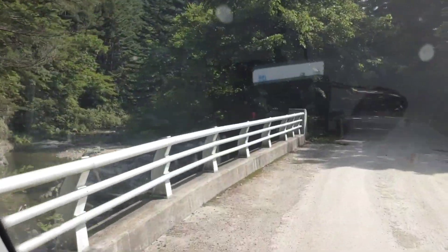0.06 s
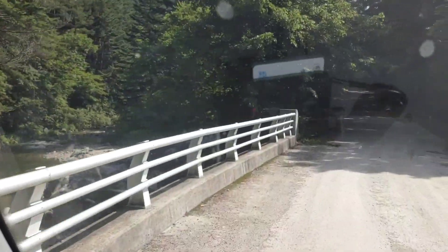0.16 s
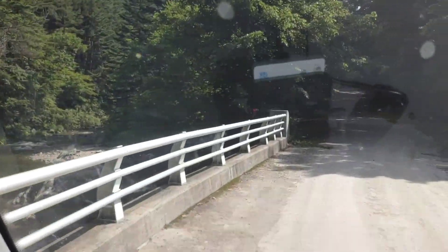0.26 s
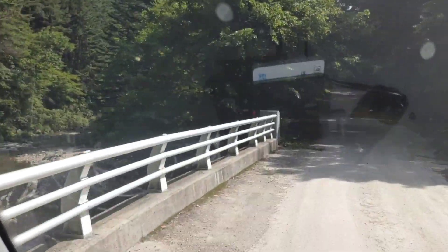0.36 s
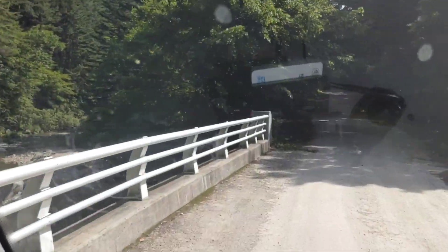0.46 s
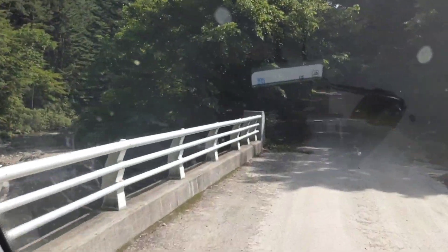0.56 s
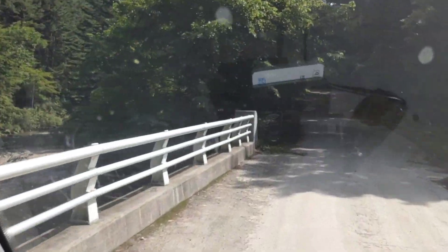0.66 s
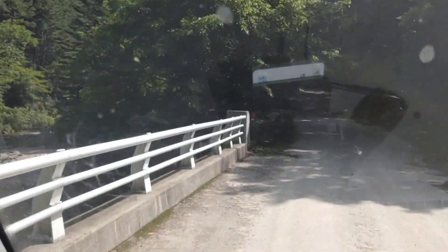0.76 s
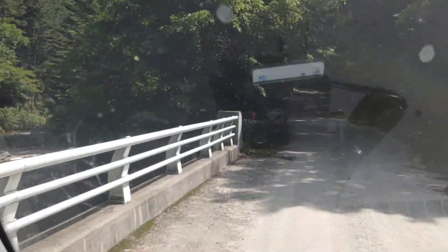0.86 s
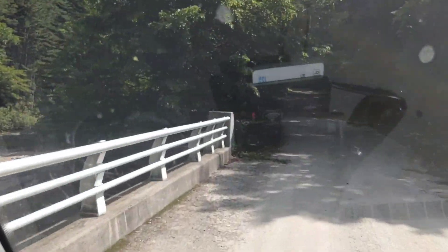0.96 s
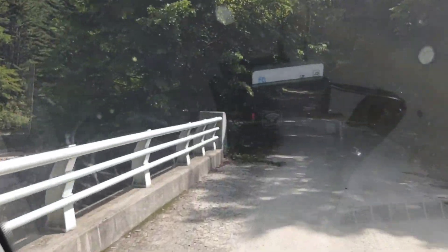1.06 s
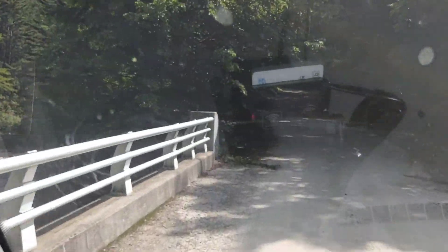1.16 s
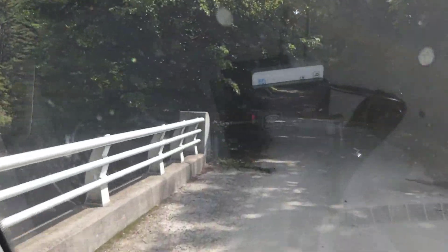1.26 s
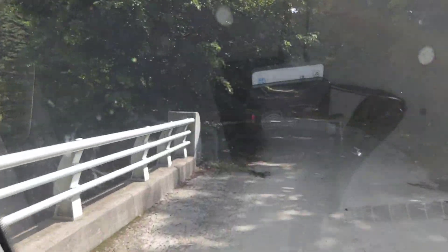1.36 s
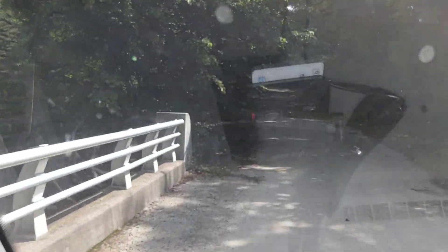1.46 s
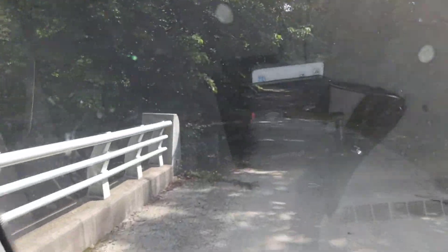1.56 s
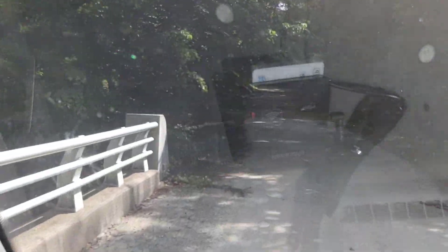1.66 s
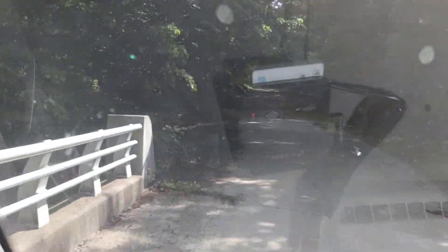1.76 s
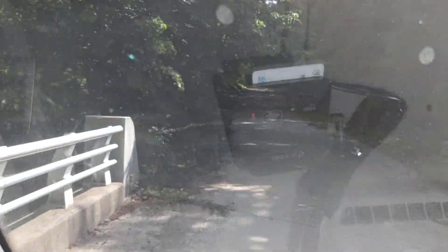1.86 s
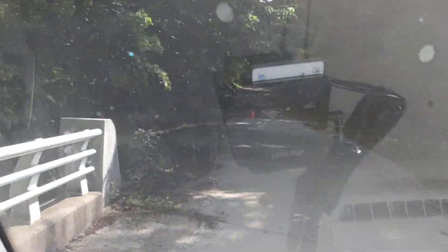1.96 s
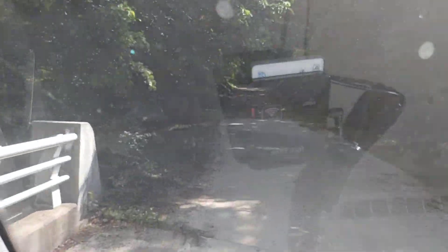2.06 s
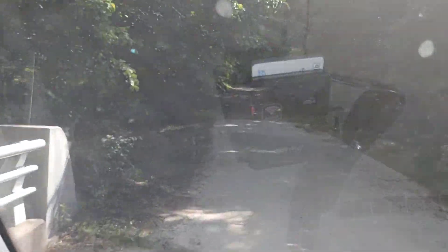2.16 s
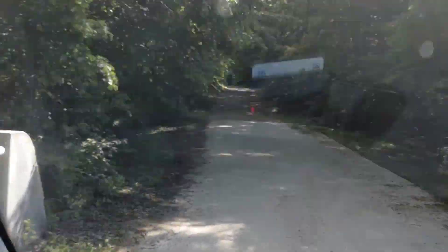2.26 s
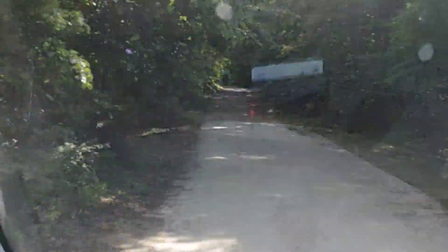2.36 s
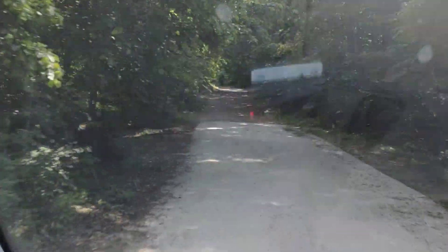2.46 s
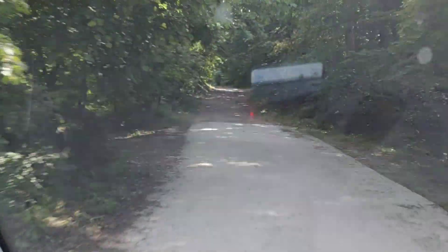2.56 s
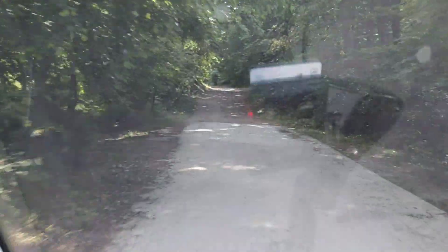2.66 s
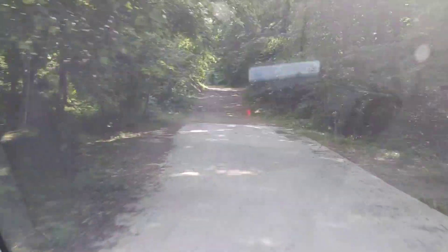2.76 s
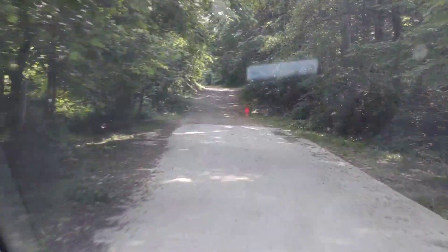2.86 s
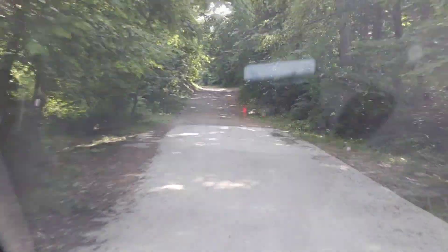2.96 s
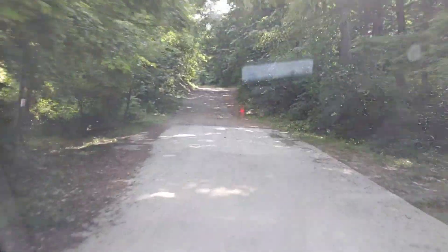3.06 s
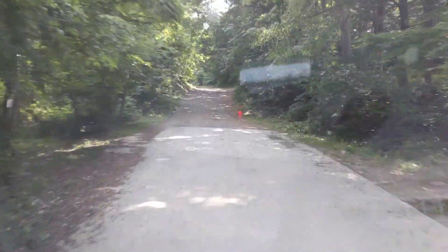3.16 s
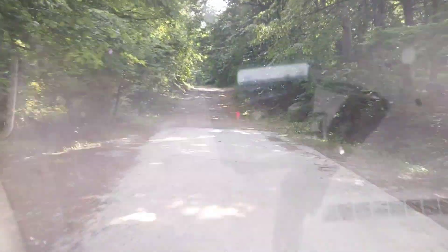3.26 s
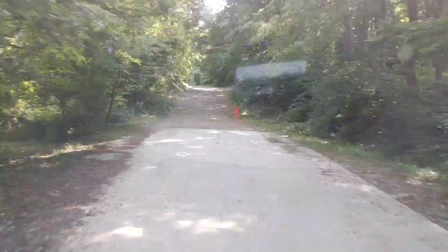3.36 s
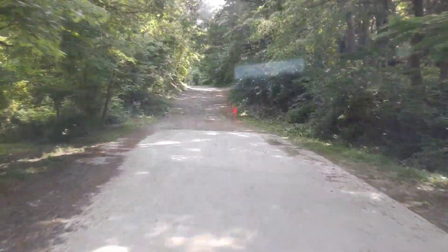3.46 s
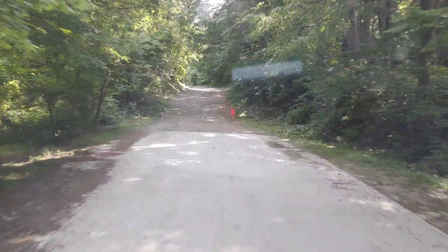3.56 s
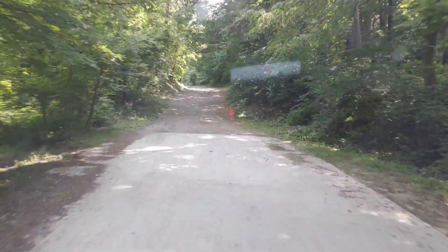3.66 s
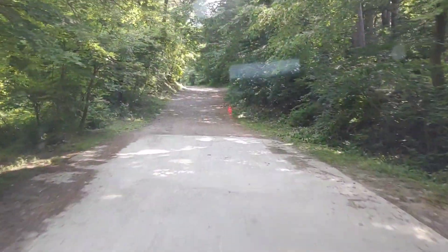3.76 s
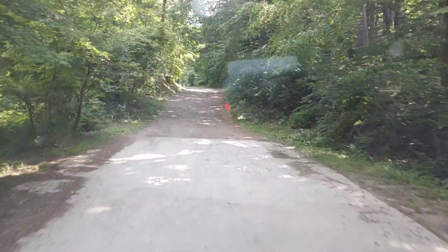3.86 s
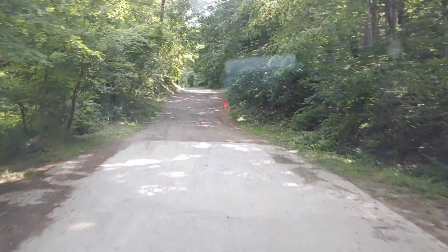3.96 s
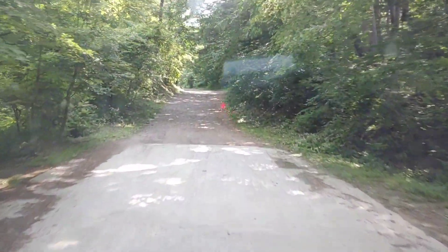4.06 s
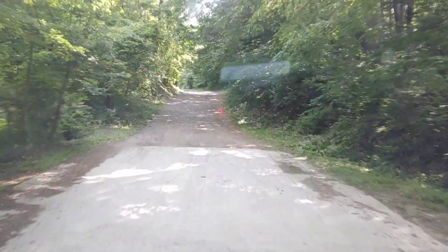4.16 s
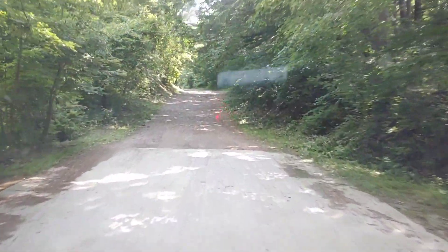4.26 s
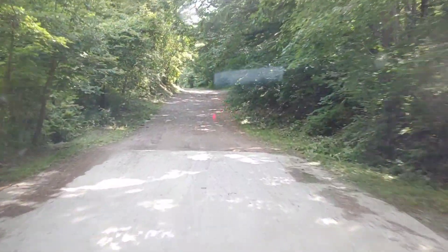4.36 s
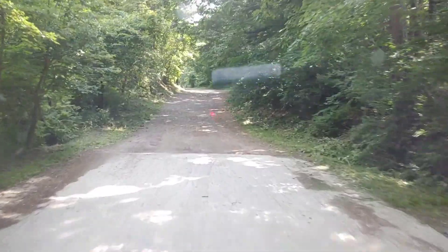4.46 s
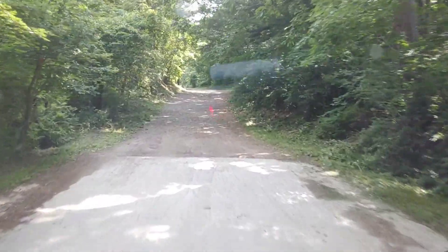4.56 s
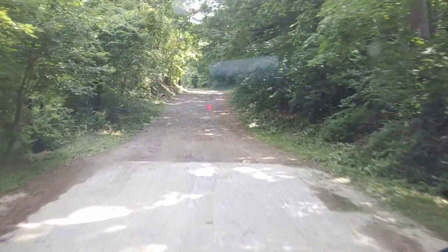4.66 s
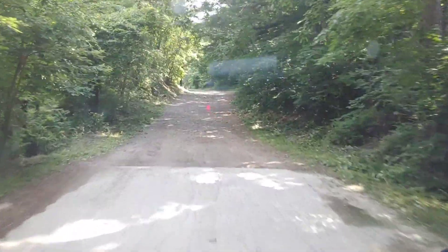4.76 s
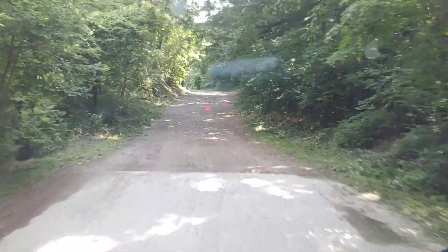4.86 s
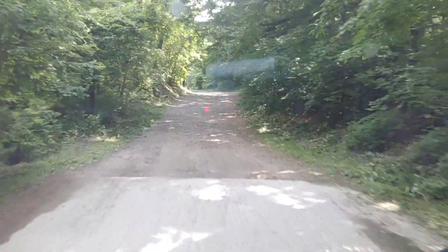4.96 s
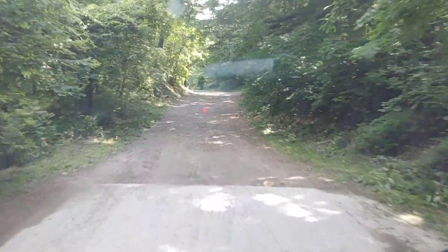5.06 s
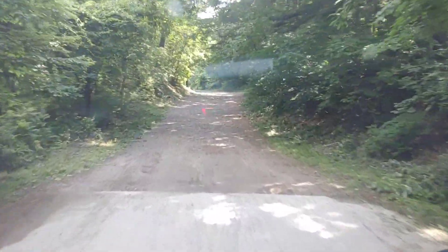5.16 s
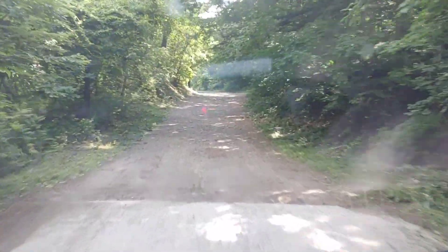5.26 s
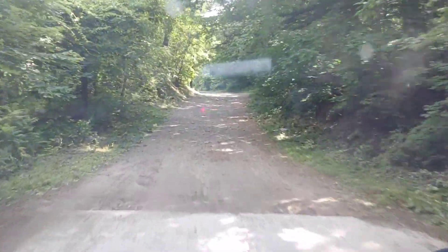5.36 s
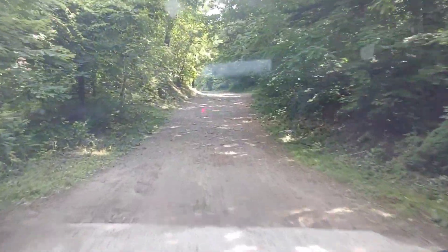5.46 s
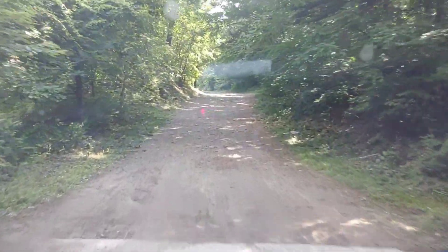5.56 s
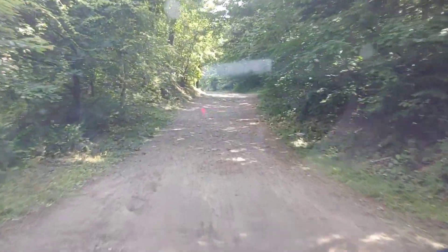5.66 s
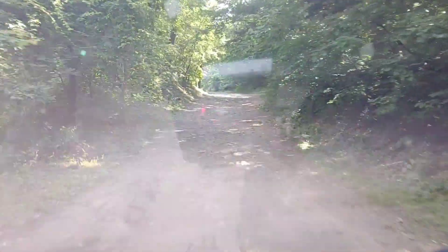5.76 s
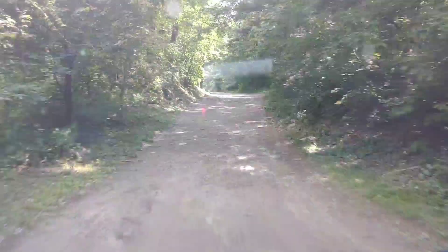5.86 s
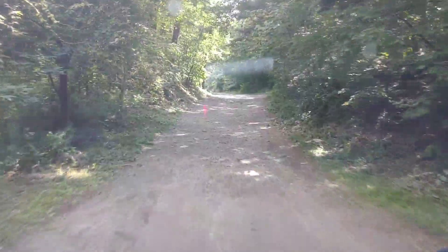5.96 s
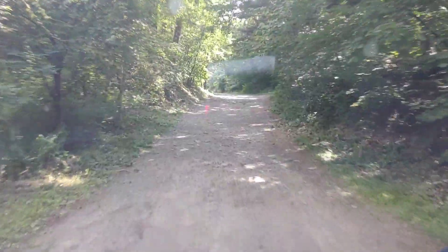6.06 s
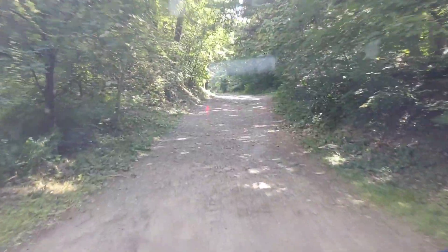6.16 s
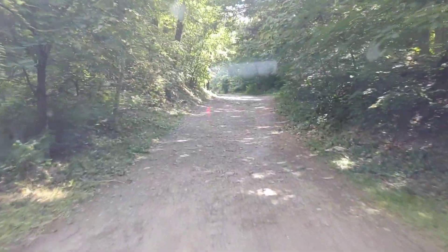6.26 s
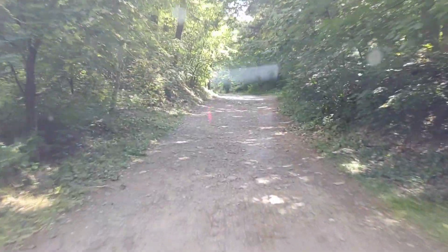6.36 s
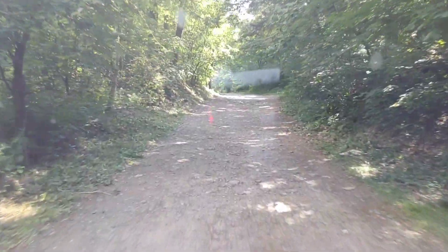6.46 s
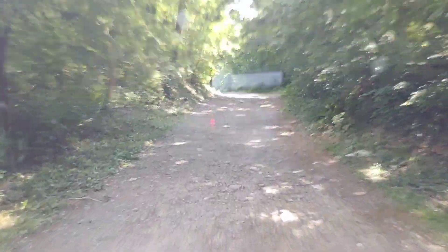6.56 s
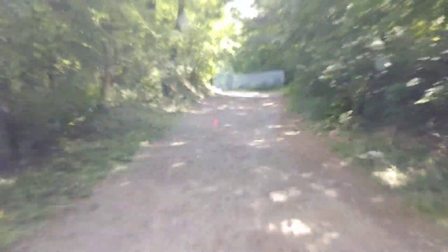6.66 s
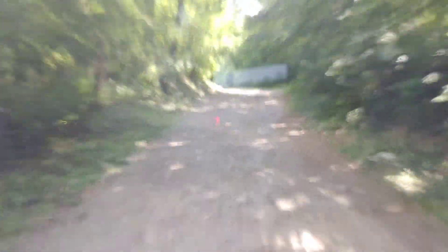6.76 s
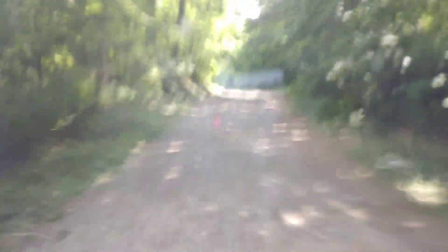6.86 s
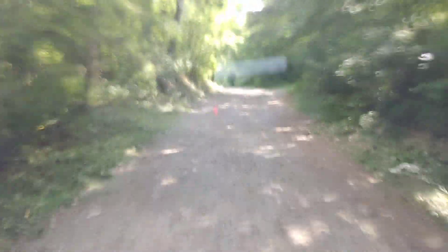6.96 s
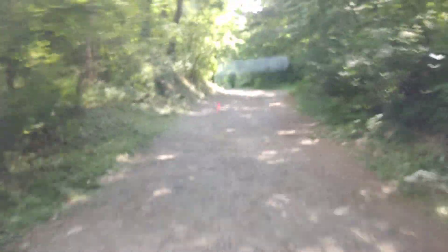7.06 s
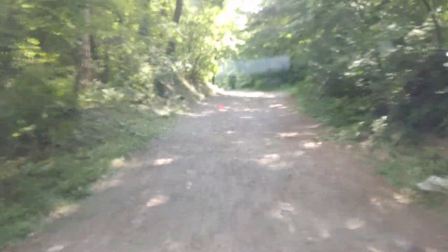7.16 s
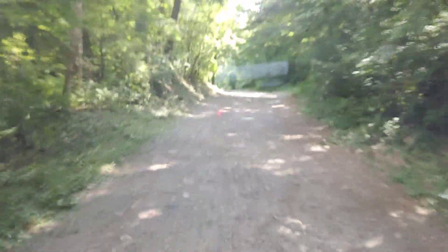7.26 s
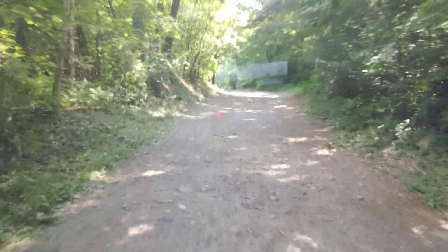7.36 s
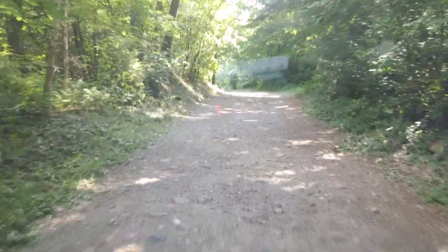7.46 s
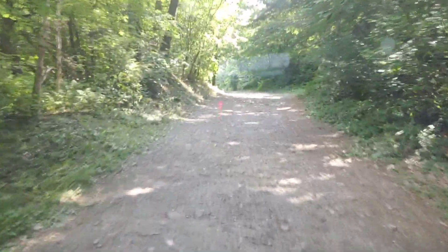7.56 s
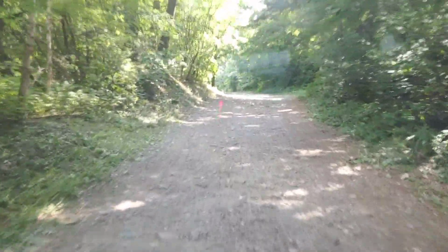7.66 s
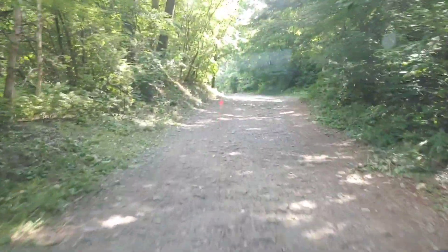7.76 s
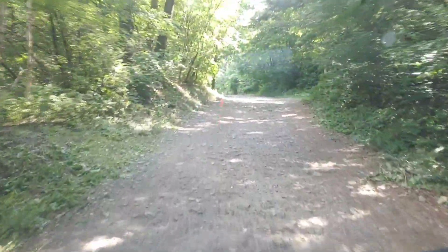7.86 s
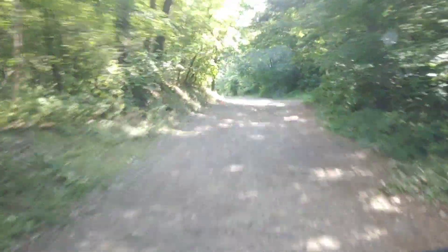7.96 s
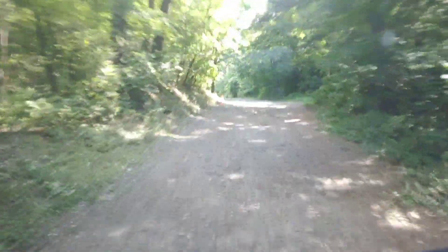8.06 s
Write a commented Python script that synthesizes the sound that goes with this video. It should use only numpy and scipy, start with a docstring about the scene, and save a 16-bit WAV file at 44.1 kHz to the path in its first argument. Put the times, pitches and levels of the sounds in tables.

```python
"""Car cabin, bridge deck to gravel

Inside a car on a concrete bridge deck: a brief stretch of stones at 3 s, a drop onto gravel at 6.6 s.
Engine: summed firing harmonics and gear whines. Tyres: noise through cabin modes, hiss, a narrow tread band.
Bumps: force bursts through cabin and trim responses. Gravel: random grains, crunches, knocks, snaps, clunks.
Close echoes comb the treble; a look-ahead limiter holds the peaks."""
import sys
import numpy as np
from scipy import signal
from scipy.fft import rfft, irfft, next_fast_len
from scipy.io import wavfile
from scipy.ndimage import uniform_filter1d, minimum_filter1d

SR = 44100
rng = np.random.default_rng(int(sys.argv[2]) if len(sys.argv) > 2 else 0)


def dump_mix(stems):
    """Bounce the given channels to the path in sys.argv[1] as a 16-bit WAV at rate SR."""
    frames = np.atleast_2d(stems).T  # one column per channel
    limited = np.clip(frames, -1, 1)  # hard clip at full scale
    pcm = np.round(limited * 32767).astype(np.int16)
    wavfile.write(sys.argv[1], SR, pcm)


N = 358091


def undb(db):
    """Decibels to amplitude gain."""
    return 10 ** (np.asarray(db) / 20)


def unit(x):
    """Scale to rms 1."""
    return x / np.sqrt(np.mean(x ** 2) + 1e-18)


def curves(table):
    """Each column of a timed table, interpolated per sample."""
    time_s, *columns = np.transpose(table)
    return [np.interp(np.arange(N) / SR, time_s, column) for column in columns]


def bins(size):
    """Spectrum frequencies in Hz, floored at 1."""
    return np.maximum(np.fft.rfftfreq(size, 1 / SR), 1)


def gains(points, size):
    """Gain per bin from (freq_hz, level_db) points, on a log frequency axis."""
    hz, db = np.transpose(points)
    return undb(np.interp(np.log(bins(size)), np.log(hz), db))


def causal(gain):
    """Minimum-phase response with these gains: it rings only after a blow."""
    cepstrum = irfft(np.log(gain))
    half = len(cepstrum) // 2
    cepstrum[1:half] *= 2
    cepstrum[half + 1:] = 0
    return np.exp(rfft(cepstrum))


# cabin air and panel modes: freq_hz, width_hz, level_db
CABIN_MODES = [(29.18, 7.1, -24), (58.2, 47, -0.5), (98.1, 6.1, 5.5), (143.8, 39, 1), (175.2, 27.4, 0),
               (233.5, 45, -4.5), (296.4, 19, -11.5), (342.2, 26, -9.5), (449.7, 21.4, -10.5),
               (550, 130, -17.5)]


def cabin(size):
    """Gain per bin of the cabin's resonances, summed in power."""
    f = bins(size)
    power = 0
    for hz, width_hz, db in CABIN_MODES:
        detuning = (f * f - hz * hz) / (f * width_hz)
        power = power + undb(2 * db) / (1 + detuning ** 2) ** 1.594
    return np.sqrt(power)


# stereo width at the two microphones: freq_hz, side_minus_mid_db
STEREO_WIDTH = [(40, -18), (120, -24), (190, -18.5), (260, -14.5), (350, -5.5), (600, -1), (1200, 2.5),
                (3000, -1), (15000, 0.5)]


def response(gain):
    """Mid and side responses: long waves reach both microphones alike."""
    size = 2 * (len(gain) - 1)
    return np.array([causal(gain), causal(gain * gains(STEREO_WIDTH, size))])


def radiate(force, gain):
    """Two rows of force through a response -> mid and side, with the mid at rms 1."""
    out = signal.fftconvolve(force, irfft(response(gain)), axes=1)[:, :N]
    return out / np.sqrt(np.mean(out[0] ** 2))


def walk(rate_hz):
    """Gaussian points, rate_hz per second, joined by straight lines."""
    steps = rng.standard_normal(2048)
    return 0.707 * np.interp(np.arange(N) / SR * rate_hz, np.arange(len(steps)), steps)


def grains(per_s, spread_db, length_s):
    """Stone contacts at chance moments and strengths, each a short decaying scatter of force."""
    strength = undb(spread_db * np.minimum(rng.exponential(size=N), 4))
    hits = (rng.random(N) < per_s / SR) * strength
    power = signal.lfilter([1], [1, -np.exp(-2 / (length_s * SR))], hits ** 2)
    return unit(np.sqrt(power) * rng.standard_normal((2, N)))


def add(out, start_s, sound):
    """Mix a sound in at start_s."""
    i = max(int(start_s * SR), 0)
    out[:, i:i + sound.shape[1]] += sound[:, :max(N - i, 0)]


def envelope(start_s, hold_s, attack_s, release_s, sag_db_per_s):
    """Linear attack, a hold that sags, exponential release."""
    t = np.arange(N) / SR - start_s
    sag = np.log(10) / 20 * sag_db_per_s * np.clip(t, 0, hold_s)
    fall = sag + np.maximum(t - hold_s, 0) / release_s
    return np.clip(t / attack_s, 0, 1) * np.exp(-np.minimum(fall, 20))


# engine speed: time_s, firing_hz
FIRING_RATE = [(0, 48.9), (.5, 49.7), (1.2, 52.26), (1.95, 53.02), (2.7, 55.3), (3.4, 57.4), (3.95, 58.03),
               (4.65, 57.72), (5.05, 55.58), (5.7, 55.92), (6.5, 55.1)]
# firing harmonics: order, full_load_db, coasting_db (relative to effort level)
FIRING_ORDERS = [(1, -22.5, -3.5), (2, -5.5, -3.5), (3, -6.5, -6.5), (4, -6, -10), (5, -13.5, -56),
                 (6, -20.5, -32), (8, -31, -36)]
# engine effort: time_s, throttle_0_to_1, level_db
EFFORT = [(0, 0.1, -32), (.5, 0.9, -39), (.9, 0.92, -24), (2.2, 0.83, -22.5), (3.2, 0, -23),
          (8.12, 0.67, -30)]
# drivetrain whines: start_s, end_s, order, level_db
GEAR_WHINES = [(0.963, 2.4, 18, -52.5), (2.1, 3.1, 16, -48.5), (2.07, 4.7, 36, -55), (5.64, 6.6, 16, -47.5),
               (5.65, 6.7, 18, -51), (5.8, 6.39, 36, -53), (0.87, 2.4, 10, -45.5)]


def engine(waver_db=4.0, whine_waver_db=3.0, drift=0.003, hum_side_db=-28, whine_side_db=-12):
    """Firing harmonics, balanced by load, and thin whines geared to the same shaft."""
    firing_hz, = curves(FIRING_RATE)
    load, effort_db = curves(EFFORT)
    t = np.arange(N) / SR
    phase = 2 * np.pi * np.cumsum(firing_hz * (1 + drift * walk(14))) / SR
    hum, whine = 0, 0
    for order, pull_db, coast_db in FIRING_ORDERS:
        order_db = effort_db + coast_db + load * (pull_db - coast_db) + waver_db * walk(8.7)
        hum = hum + undb(order_db) * np.sin(round(order) * phase + 2 * np.pi * rng.random())
    for start_s, end_s, order, db in GEAR_WHINES:
        fade = np.clip(np.minimum(t - start_s, end_s - t) / 0.3, 0, 1)
        whine = whine + fade * undb(db + whine_waver_db * walk(20)) * np.sin(round(order) * phase)
    side = undb(hum_side_db) * hum + undb(whine_side_db) * whine
    return np.sqrt(2) * np.array([hum + whine, side])


# drumming of the firm surface: time_s, relative_db
FIRM_SURFACE = [(0, -25), (.33, -21.5), (.47, -29.5), (.72, -20), (1.35, -29.5), (2.2, -26), (3.8, -23.5),
                (4.5, -24.5), (6.5, -23.5)]
# stretches of loose stones: start_s, length_s, drumming_db, crunch_db, grit_db (all relative)
STONE_PATCHES = [(3.036, 0.24, -22, -32, -46), (6.587, 0.69, -12, -26, -36.5), (7.422, 0.69, -19, -36, -64),
                 (8.02, 0.077, -12.5, -23.5, -39)]
PATCH_ATTACK_S, PATCH_RELEASE_S = 0.027, 0.12
DRUM_SAG_DB_PER_S, STONE_SAG_DB_PER_S = 1.5, 0.5  # the tyres settle into each stretch


def drumming():
    """Level in dB at which the surface shakes the wheels: firm surface plus each stretch of stones."""
    power = undb(curves(FIRM_SURFACE)[0]) ** 2
    for start_s, length_s, db, _, _ in STONE_PATCHES:
        shape = envelope(start_s, length_s, PATCH_ATTACK_S, PATCH_RELEASE_S, DRUM_SAG_DB_PER_S)
        power = power + (undb(db) * shape) ** 2
    return 10 * np.log10(power)


# drumming force spectrum: freq_hz, level_db
DRUM_SPECTRUM = [(25, -19), (70, -8.5), (120, -0.5), (250, 1.5), (330, -1.5), (600, -5), (1200, 5),
                 (4000, -18.5)]
# long-wave rumble spectrum: freq_hz, level_db
DEEP_SPECTRUM = [(12, 19), (25, -19), (45, -10), (68, -12), (100, -9), (200, -37.5)]


def road(gain_db=1, flutter_db=1.0, deep_db=-15, deep_share=0.54):
    """Surface texture drums through suspension into cabin; long waves in the road rumble more evenly."""
    db = drumming()
    modes = cabin(8192)
    force = grains(per_s=1500, spread_db=0.85, length_s=0.0028) * undb(flutter_db * walk(27))
    drum = radiate(force, modes * gains(DRUM_SPECTRUM, size=8192)) * undb(db + gain_db)
    deep = radiate(rng.standard_normal((2, N)), modes * gains(DEEP_SPECTRUM, size=8192))
    return drum + deep * undb(deep_db + deep_share * db)


# tyre and air hiss: time_s, relative_db
HISS_LEVEL = [(0, -42.5), (.5, -38), (1.4, -42), (3.1, -40.5), (3.5, -43), (5.1, -43.5)]
# hiss spectrum: freq_hz, level_db
HISS_SPECTRUM = [(250, -7), (450, -5.5), (620, -3), (740, -10), (910, -8.5), (1080, -9), (1220, -12.5),
                 (1340, -7.5), (1480, -11), (1950, -10), (2300, -17), (3150, -16), (3650, -19.5),
                 (4100, -18.5), (5100, -20), (7000, -28.5), (8100, -24.5), (10500, -27.5), (12500, -34.5),
                 (15500, -44)]


def hiss(gain_db=5, flutter_db=1.0, direct_db=-11):
    """Treads and passing air as noise; a part arrives from one side, reaching the left microphone first."""
    db, = curves(HISS_LEVEL)
    colour = gains(HISS_SPECTRUM, size=8192)
    air = radiate(rng.standard_normal((2, N)), colour)
    left = radiate(rng.standard_normal((2, N)), colour)[0]
    right = np.roll(left, 18)  # delay in samples
    direct = np.array([left + right, left - right]) / np.sqrt(2)
    air = air + undb(direct_db) * direct
    return air * undb(db + gain_db + flutter_db * walk(22.06))


# tread band on the bridge deck: time_s, level_db, centre_hz
TREAD_BAND = [(0, -43, 1924), (.3, -47.5, 1844), (.52, -38, 2010), (.68, -42, 1925), (.85, -41.5, 1896),
              (1.3, -45.5, 1850), (1.55, -61, 1860), (2.0, -55, 1763), (2.3, -46, 1863), (2.8, -54, 1663),
              (3.4, -65, 1640)]


def tread_song(width_hz=560, swell_db=3, wander_hz=90):
    """Narrow band of tread noise that swells and slides with the grain of the deck."""
    db, hz = curves(TREAD_BAND)
    lowpass = signal.butter(2, width_hz / 2, fs=SR, output="sos")
    slow = signal.sosfilt(lowpass, rng.standard_normal((2, 2, N)))
    phase = 2 * np.pi * np.cumsum(hz + wander_hz * walk(9.8)) / SR
    band = unit(slow[0] * np.cos(phase) + slow[1] * np.sin(phase))
    return band * undb(db + swell_db * walk(16.9))


# chance blows: boom relative to drumming, rattle relative to boom
JOLTS_PER_S, JOLT_DB, JOLT_SPREAD_DB, JOLT_RATTLE_DB = 4, 4.5, 1.5, -16.5


def jolts():
    """Lesser wheel blows at chance moments, as strong as the surface is rough; rows as in WHEEL_BLOWS."""
    surface_db, chance = drumming(), rng.random((64, 2))
    times_s = (np.arange(len(chance)) + chance[:, 0]) / JOLTS_PER_S
    rows = []
    for time_s, u in zip(times_s, chance[:, 1]):
        if time_s < N / SR:
            db = surface_db[int(time_s * SR)] + JOLT_DB + JOLT_SPREAD_DB * (2 * u - 1)
            rows.append((time_s, db, JOLT_RATTLE_DB))
    return rows


# wheel blows: time_s, boom_peak_db (before limiter), rattle_relative_db
WHEEL_BLOWS = [(0.074, -16.5, -7), (0.191, -8.5, -13), (.301, -10.5, -8), (0.379, -4, -18.5),
               (0.643, -4.5, -16), (.794, -8, -8), (.922, -4.5, -27), (1.019, -22, -14), (1.113, -9, -23),
               (1.863, -16, -7), (2.535, -10, -23), (2.702, -5.5, -12), (2.869, -13.5, -9),
               (2.968, -8, -12), (3.08, -2.5, -11), (3.098, -8, -19), (3.125, -5.5, -4.5),
               (3.159, -13.5, 4.5), (3.188, -10.5, -18), (3.207, -11, -22), (3.263, -20, 1),
               (3.285, -10.5, -4.5), (3.321, -12.5, -13), (3.362, -14.5, -10), (3.573, -6.5, -17),
               (3.771, -7.5, -7.5), (3.837, -12, -10.5), (3.925, -10, -10), (4.1, -9.5, -17),
               (4.206, -4, -11.5), (4.517, -4, -9.5), (4.807, -5.5, -14.5), (4.898, -8.5, -6.5),
               (5.138, -10.5, -18), (5.271, -10, -16), (5.387, -12, -11), (5.459, -9, -12),
               (5.544, -4.5, -25), (5.649, -2, -11.5), (6.057, -6, -18), (6.299, -9.5, -22),
               (6.451, -5.5, -19), (6.498, -13.5, -9), (6.592, -10, 0.5), (6.625, -6, -1),
               (6.666, -0.5, -4.5), (6.71, -4.5, -1), (6.744, 1, -4.5), (6.8, 2.5, -6), (6.845, 2.5, -4),
               (6.878, 3, -7), (6.942, 6, -4.5), (7.03, -2, -2.5), (7.06, 3, -5.5), (7.142, 1.5, -4),
               (7.195, -1, -6.5), (7.222, -5, -17), (7.277, -7.5, -10), (7.311, -1, -7.5), (7.349, 3.5, -7),
               (7.412, 5, -11), (7.449, -2, -13), (7.532, -5, -6), (7.577, -0.5, -9), (7.629, -9, -4),
               (7.699, -8.5, -8), (7.793, -12, 0.5), (7.837, -8.5, -0.5), (7.9, -12, 1), (7.958, -6.5, -6),
               (8.006, -2, -4), (8.052, -11, 1), (8.085, -5.5, -0.5)]
# boom spectrum: freq_hz, level_db
BOOM_SPECTRUM = [(25, -4.5), (70, -11.5), (120, -2.5), (172, 1.5), (240, -8.5), (320, -8), (450, -8),
                 (700, -17), (2000, -40.5)]
# trim rattle spectrum: freq_hz, level_db
RATTLE_SPECTRUM = [(150, -28.5), (300, 13.5), (350, 7.5), (390, 4.5), (450, 4.5), (600, 0.5), (800, -6.5),
                   (1100, -12.5), (2500, -24.5), (4000, -29.5), (9000, -40), (15000, -50)]


def bumps(boom_s=0.00848, rattle_s=0.0068, rattle_db=-2, lead_s=.0035, scatter=1.17, size=8192):
    """A blow is one push amid smaller ones, dying in the cabin's modes; the trim chatters with it."""
    out, t = np.zeros((2, N)), np.arange(size) / SR
    body = response(cabin(size) * gains(BOOM_SPECTRUM, size))
    trim = response(gains(RATTLE_SPECTRUM, size))
    soft_ends = signal.windows.tukey(size, .03)
    for time_s, db, rel_db in WHEEL_BLOWS + jolts():
        blow = (body, boom_s, 1, db)
        chatter = (trim, rattle_s, 0, db + rel_db + rattle_db)
        for path, rise_s, push, peak_db in blow, chatter:
            swell = t / rise_s * np.exp(-t / rise_s)
            force = scatter * unit(rng.standard_normal((2, size)) * swell) / np.sqrt(size)
            force[:, int(rise_s * SR)] += push * rng.choice([-1, 1], size=2)
            spectrum = rfft(force)
            # flatten: a blow reaches all modes alike
            even = spectrum / np.sqrt(uniform_filter1d(np.abs(spectrum) ** 2, size=25) + 1e-9)
            ring = irfft(even * path) * soft_ends
            add(out, time_s - lead_s, ring * undb(peak_db) / np.abs(ring[0]).max())
    return out


# treads throwing stones: time_s, crunch_db, grit_db
STONE_SPRAYS = [(6.663, -22, -31), (6.72, -15, -24), (6.776, -23, -27), (6.839, -17, -22)]
SPRAY_ATTACK_S, SPRAY_DECAY_S = 0.015, 0.044


def stone_flow():
    """Crunch and grit strength: nearly steady on each stretch, surging with each spray."""
    power = np.zeros((2, N))
    for start_s, length_s, _, crunch_db, grit_db in STONE_PATCHES:
        shape = envelope(start_s, length_s, PATCH_ATTACK_S, PATCH_RELEASE_S, STONE_SAG_DB_PER_S)
        power += np.outer(undb([crunch_db, grit_db]), shape) ** 2
    for time_s, crunch_db, grit_db in STONE_SPRAYS:
        start_s = time_s - SPRAY_ATTACK_S / 2
        shape = envelope(start_s, SPRAY_ATTACK_S, SPRAY_ATTACK_S, SPRAY_DECAY_S, STONE_SAG_DB_PER_S)
        power += np.outer(undb([crunch_db, grit_db]), shape) ** 2
    return np.sqrt(power)


# crunch spectrum: freq_hz, level_db
CRUNCH_SPECTRUM = [(150, -7.5), (310, 19.5), (400, 4.5), (620, 11.5), (800, -6.5), (1150, -4.5), (1600, -6),
                   (2400, -7), (3500, -20), (6000, -45), (15000, -49)]
# underbody panel modes: freq_hz, width_hz, level_db
PANEL_MODES = [(1058, 90, 11), (1360, 38, -2), (2230, 550, -9), (3100, 350, -25)]
# grit spectrum, also of snaps: freq_hz, level_db
GRIT_SPECTRUM = [(1000, 7.5), (2500, 0), (4300, 2), (5600, -4), (7000, -7), (8000, -4.5), (10500, -5),
                 (12500, -14), (15500, -17)]


def gravel(clump_db=8.5, grit_clump_db=3.5, pebble_db=-11.5):
    """Stones grind in clumps under treads, pebbles ring the underbody, grit sprays the wheel wells."""
    coarse, fine = stone_flow()
    crunch_force = grains(per_s=320, spread_db=0.0, length_s=0.0016)
    crunch = radiate(crunch_force, gains(CRUNCH_SPECTRUM, size=8192))
    panel = 0
    for hz, width_hz, db in PANEL_MODES:
        panel = panel + undb(db) / (1 + (2 * (bins(8192) - hz) / width_hz) ** 2) ** 0.52
    pebbles = radiate(grains(per_s=69, spread_db=3.0, length_s=0.0046), panel)
    grit_force = grains(per_s=2100, spread_db=1.5, length_s=0.0042)
    grit = radiate(grit_force, gains(GRIT_SPECTRUM, size=8192))
    stones = crunch * undb(clump_db * walk(55)) + pebbles * undb(pebble_db)
    return stones * coarse + grit * fine * undb(grit_clump_db * walk(77))


# loose-panel clunks on hard blows: time_s, peak_db, ring_hz
PANEL_CLUNKS = [(3.082, -16, 314), (5.543, -17, 315), (6.666, -15, 349), (7.531, -8, 322),
                (8.085, -17, 362)]


def clunks(width_hz=32, overtone=1.736, overtone_db=-11, size=8192):
    """A loose panel swings up and dies away in two hollow modes, at a pitch set by where it is hit."""
    out, f = np.zeros((2, N)), bins(size)
    for time_s, db, hz in PANEL_CLUNKS:
        low, high = (1 / (1 + (2 * (f - k * hz) / (k * width_hz)) ** 2) for k in (1, overtone))
        path = response(low + undb(overtone_db) * high)
        ring = irfft(path * rng.choice([-1, 1], size=(2, 1)))
        add(out, time_s, ring * undb(db) / np.abs(ring[0]).max())
    return out


# single stones crushed under a tread: time_s, level_db, body_hz, rise_s
CRUSHED_STONES = [(3.124, -31, 2500, 0.0037), (3.157, -34, 1700, 0.0057), (3.283, -41, 1300, 0.016),
                  (4.197, -35, 1490, 0.0068), (4.512, -33, 1480, 0.004), (4.524, -41, 2200, .005),
                  (5.645, -39, 1300, 0.0071), (6.655, -41, 2385, 0.0046), (6.724, -28, 1500, .005),
                  (6.776, -35, 3400, 0.0038), (6.79, -28, 1400, 0.016), (6.834, -23.5, 2670, 0.005),
                  (6.867, -30, 1360, 0.0054), (6.897, -33, 1500, 0.0064), (6.933, -37, 1610, 0.0099),
                  (7.032, -41, 2400, 0.0033), (7.054, -29, 2390, 0.0032), (7.102, -43, 6050, .003),
                  (7.139, -32, 2200, 0.0027), (7.18, -29, 1800, 0.0078), (7.277, -44, 4500, .003),
                  (7.288, -27, 1910, 0.006), (7.346, -28, 1680, 0.008), (7.408, -30.5, 2560, 0.0045),
                  (7.45, -32, 2080, 0.0036), (7.531, -31, 1900, .004), (7.578, -31.5, 1885, 0.0034),
                  (7.632, -37, 1914, 0.0026), (7.839, -42, 1700, 0.0039), (7.894, -43, 4230, .003),
                  (8.057, -34, 1760, 0.0066), (8.085, -29.5, 2000, 0.004)]


def crunches(sharpness=1.46, skirt=0.94, cracks_per_s=3200, size=4096):
    """A stone gives way under a tread: a short volley of cracks, coloured by the size of the stone."""
    out, t, f = np.zeros((2, N)), np.arange(size) / SR, bins(size)
    for time_s, db, hz, rise_s in CRUSHED_STONES:
        swell = t / rise_s * np.exp(1 - t / rise_s)
        cracks = (rng.random((2, size)) < cracks_per_s / SR) * rng.standard_normal((2, size)) * swell
        body = causal(1 / (1 + (sharpness * (f / hz - hz / f)) ** 2) ** skirt + 1e-3)
        volley = unit(irfft(rfft(cracks) * body)) * np.sqrt(np.mean(swell ** 2))
        add(out, time_s, volley * undb(db))
    return out


# stones that knock the body: time_s, level_db, ring_hz, crack_share_0_to_1
BODY_KNOCKS = [(3.161, -27, 1200, .8), (6.707, -1.5, 1094, 0.54), (6.874, -2, 1160, 0.72),
               (6.996, -9.5, 1096, .6), (7.177, -11, 1070, 0.84), (7.739, -6, 1120, 0.74),
               (7.837, -21, 1570, .9), (8.024, -6.5, 1110, 0.45), (8.044, -13, 1090, 0.52)]


def knocks(t60_s=0.031, crack_db=-3, crack_s=0.0018, size=4096):
    """A thrown stone cracks against the body and rings a damped panel."""
    out, t = np.zeros((2, N)), np.arange(size) / SR
    for time_s, db, hz, crack in BODY_KNOCKS:
        ring = np.sin(2 * np.pi * hz * t + np.array([[0], [1]])) * np.exp(-np.log(1000) * t / t60_s)
        band = signal.butter(2, [0.63 * hz, 1.18 * hz], "band", fs=SR, output="sos")
        tick = unit(signal.sosfilt(band, rng.standard_normal((2, size)))) * np.exp(-t / crack_s)
        knock = (1 - crack) * ring + crack * undb(crack_db) * tick
        add(out, time_s, undb(db) * knock * np.array([[1], [.7]]))  # mid, side
    return out


# stones that split: time_s, relative_peak_db
STONE_SNAPS = [(6.705, -11.5), (6.732, -18), (6.846, -10), (6.971, -23), (6.995, -26), (7.036, -20),
               (7.058, -26), (7.105, -20), (7.279, -20), (7.412, -25), (7.739, -25)]


def snaps(gain_db=-2, decay_s=0.0061, size=2048):
    """A stone splits at once: a sudden decaying noise burst as bright as the grit."""
    out, t = np.zeros((2, N)), np.arange(size) / SR
    path = response(gains(GRIT_SPECTRUM, size))
    for time_s, db in STONE_SNAPS:
        burst = irfft(rfft(rng.standard_normal((2, size)) * np.exp(-t / decay_s)) * path)
        add(out, time_s, burst * undb(db + gain_db) / np.abs(burst[0]).max())
    return out


def reflections(x, count=40, wet=.4, span_s=.014, sway_hz=.3):
    """Glass and dashboard echoes comb the treble at each microphone and shift as the microphones sway."""
    echoes = np.zeros((4, 2048))
    for row in echoes:
        delay_s = rng.uniform(.001, span_s, count)
        row[(delay_s * SR).astype(int)] = rng.standard_normal(count) * np.exp(-2 * delay_s / span_s)
        row *= wet / np.linalg.norm(row)
    treble = signal.sosfilt(signal.butter(2, 900, "high", fs=SR, output="sos"), x)
    here = signal.fftconvolve(treble, echoes[:2], axes=1)[:, :N]
    there = signal.fftconvolve(treble, echoes[2:], axes=1)[:, :N]
    sway = 2 * np.pi * sway_hz * np.arange(N) / SR
    return x + here * np.cos(sway) + there * np.sin(sway)


# uneven cabin colour: freq_hz, left_minus_right_db
LEFT_RIGHT_LEAN = [(60, -2), (110, 0.5), (200, 0), (380, 3), (700, -3), (1290, -1), (2380, 2), (4400, 1.5),
                   (8120, 0.5), (15000, -1)]


def scene():
    """All sources as mid and side, then left and right with the cabin's uneven colour."""
    rolling = engine() + road() + hiss() + tread_song() + bumps()
    stones = gravel() + clunks() + crunches() + knocks() + snaps()
    mid, side = rolling + stones
    size = 2 * next_fast_len(N // 2 + 4096)
    lean = np.sqrt(gains(LEFT_RIGHT_LEAN, size))
    spectra = rfft([mid + side, mid - side], size) * np.array([lean, 1 / lean])
    return reflections(irfft(spectra)[:, :N])


def record(dry, ceiling=1.0, top_hz=15400):
    """A fast look-ahead limiter holds the booms; a steep low-pass cuts the top."""
    need = np.minimum(1, ceiling / (np.abs(dry).max(axis=0) + 1e-9))
    gain = uniform_filter1d(minimum_filter1d(need, size=301), size=301)
    return signal.sosfilt(signal.ellip(8, .2, 70, top_hz, fs=SR, output="sos"), dry * gain)


dry = scene()
out = record(dry)
dump_mix(out)
```